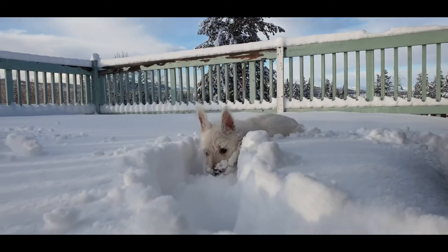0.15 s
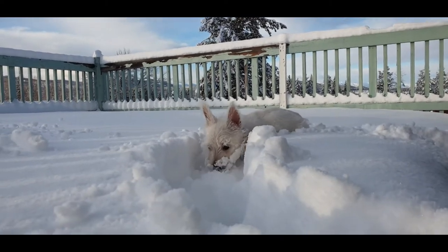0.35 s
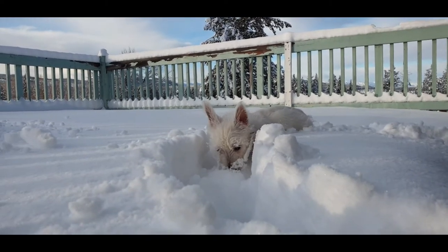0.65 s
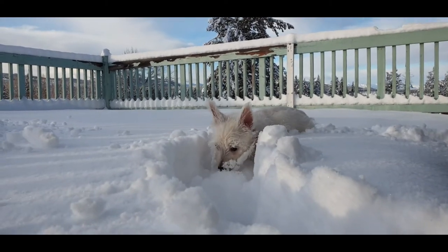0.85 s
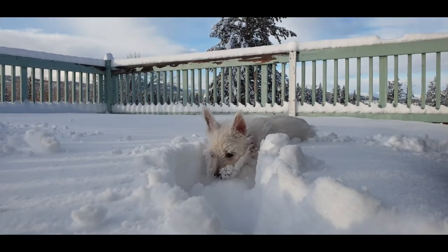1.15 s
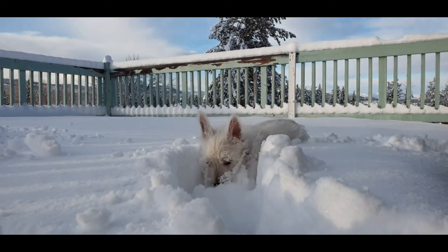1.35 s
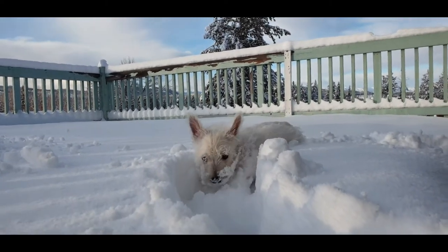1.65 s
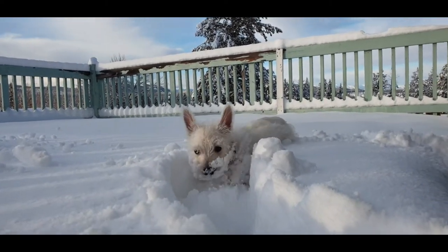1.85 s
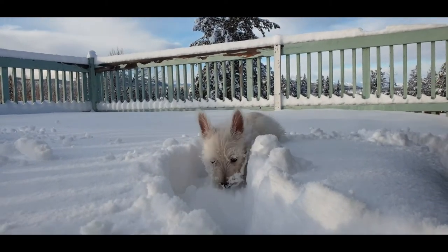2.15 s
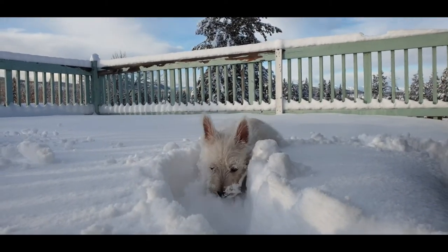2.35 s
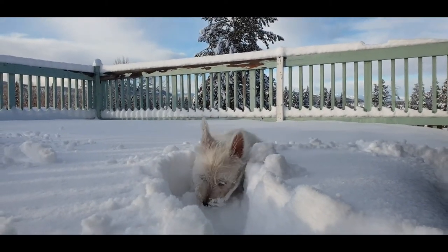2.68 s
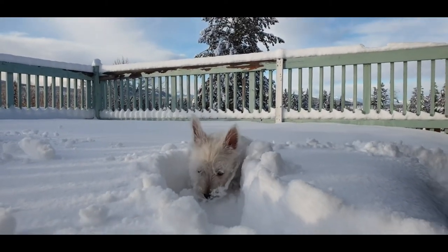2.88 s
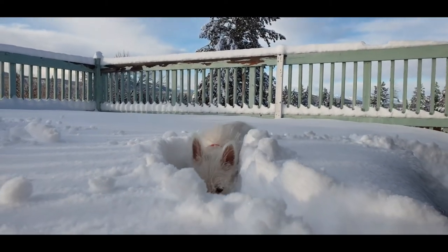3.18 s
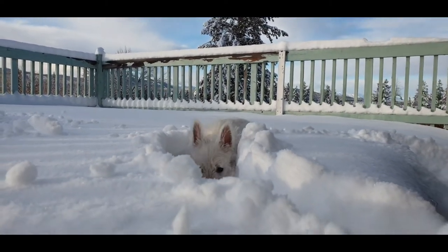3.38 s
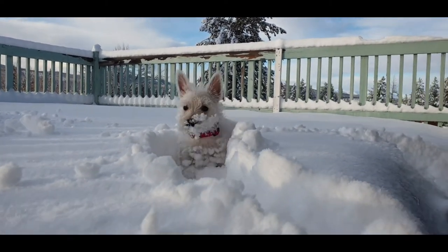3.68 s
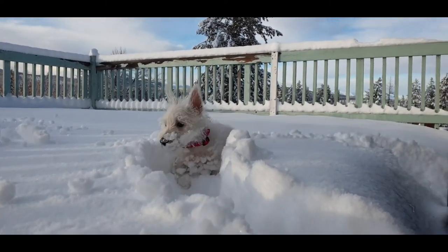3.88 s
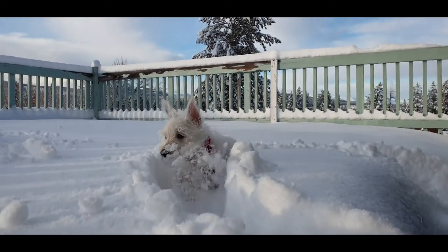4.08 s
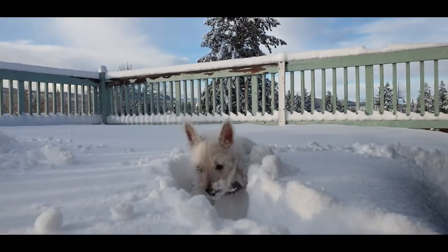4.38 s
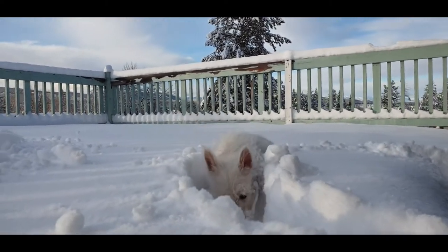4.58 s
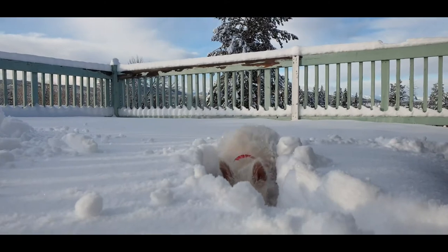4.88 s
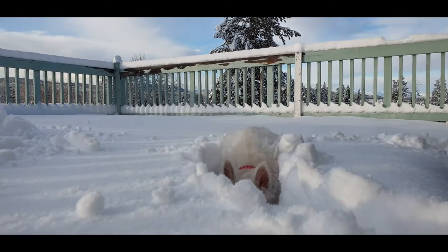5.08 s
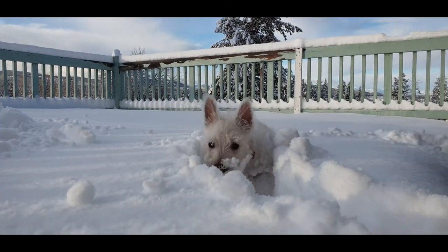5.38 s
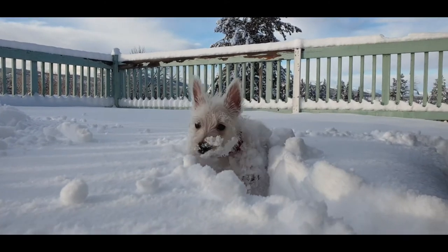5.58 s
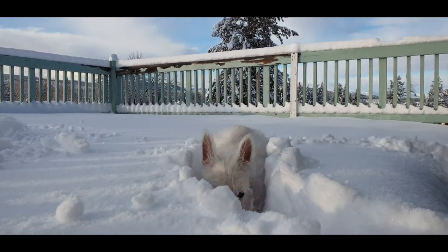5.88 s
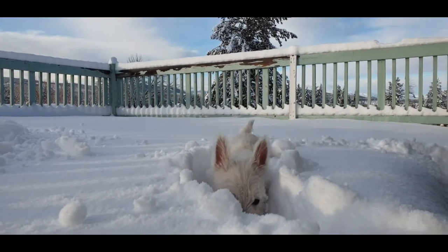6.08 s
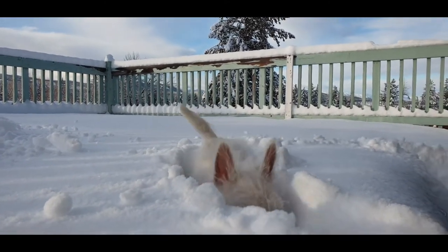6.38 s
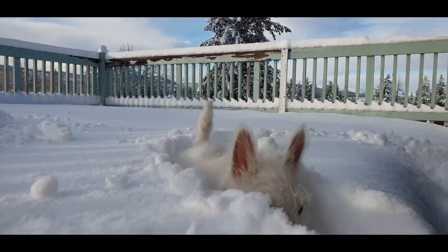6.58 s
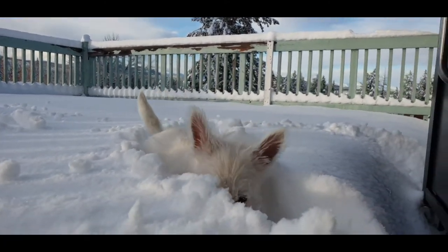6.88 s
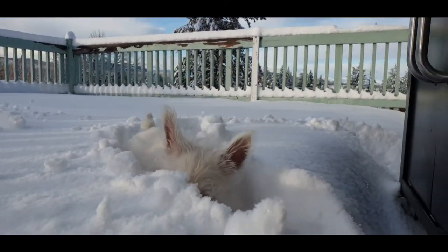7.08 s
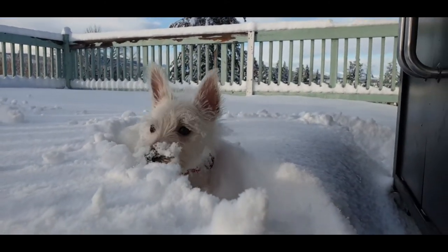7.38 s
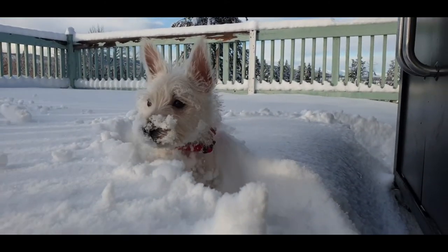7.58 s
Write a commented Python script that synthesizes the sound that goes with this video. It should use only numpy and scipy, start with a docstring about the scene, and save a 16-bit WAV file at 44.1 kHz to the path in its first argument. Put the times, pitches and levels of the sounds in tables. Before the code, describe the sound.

Close handheld stereo microphone in deep snow that absorbs all echo. Heavy hollow thumps hit buried deck boards at once, then near silence with small knocks, cloth brushes and finger clicks at right. From just after two seconds a small dog shoves through powder, crunching, swishing and thudding in uneven bursts, strongest around four seconds. Collar-like tinkling follows the thuds; later digging is lighter, finishing with crisp ticks and short snow scrapes over faint rumble.

```python
"""A puppy digs in deep powder on a wooden deck: snow packs, shears and sprays as coloured noise and grains.
Steps thump the boards with decaying sine booms and noise bursts; paws and muzzle scuff more softly.
Small hard things tick and a metal pull tinkles, as short bursts and a narrow band of chatter.
Someone close by brushes jacket cloth (swelling noise) and catches a finger on a hand-held camera,
by its right microphone (filtered clicks). A low outdoor rumble and faint hiss lie under everything."""
import sys
import numpy as np
from scipy import signal
from scipy.fft import rfft, irfft
from scipy.io import wavfile
from scipy.ndimage import uniform_filter1d

SR = 44100
rng = np.random.default_rng(int(sys.argv[2]) if len(sys.argv) > 2 else 0)


def transcribe(u):
    """Save the signal u as a 16-bit wav file named by the first command-line argument.

    u: samples, shape (n,) or (channels, n), limited to [-1, 1]; the rate is SR.
    q: integer samples, one column per channel.
    """
    v = np.clip(np.atleast_2d(u).T, -1, 1)
    q = np.round(v * 32767).astype(np.int16)
    wavfile.write(sys.argv[1], SR, q)


N = 341334
TIME, HZ = np.arange(N) / SR, np.fft.rfftfreq(N, 1 / SR)

# Relative spectral density of disturbed snow: frequency_hz, density_db
SNOW_COLOUR = [(70, -7), (170, 6.5), (290, -10.5), (450, -4), (620, -5.5), (830, -13), (1200, -11),
               (1800, -13.5), (2800, -17), (3600, -23), (7700, -27.5), (9800, -22), (11900, -25),
               (15500, -35.5)]
# Usual balance of the microphone pair: frequency_hz, left_minus_right_db
USUAL_SIDE = [(100, 4), (200, 3.5), (400, 9), (750, 8), (1400, 0.5), (2600, -8.5), (6000, -1.5), (12000, 4)]


def gain_of(db):
    """Level to amplitude: 20 dB is a factor of ten."""
    return 10 ** (np.asarray(db) / 20)


def evened(x):
    """Normalises the mean power, so that the rms is 1."""
    return x / np.sqrt(np.mean(x ** 2) + 1e-20)


def read(points, hz):
    """Interpolates a table along a logarithmic frequency axis."""
    f, value = np.transpose(points)
    return np.interp(np.log(hz + 1), np.log(f + 1), value)


def add(mix, start_s, sound):
    """Superposition: sound pressures add from start_s on."""
    part = mix[:, max(round(start_s * SR), 0):][:, :sound.shape[1]]
    part += sound[:, :part.shape[1]]


def panned(left_db):
    """Constant-power panning: gains of a left-right level difference."""
    return np.sqrt(2 / (1 + gain_of([-2 * left_db, 2 * left_db])))


def below(hz, edge_hz, order=6):
    """Crossover: the share of the power that lies below the edge."""
    return 1 / (1 + (hz / edge_hz) ** order)


def heard(drive, colour, side=USUAL_SIDE):
    """Spaced microphones: coherence falls from the bass to the treble; colour filters both."""
    # left-right coherence: frequency_hz, coherence (0 to 1)
    coherence = [(100, .998), (200, .99), (370, .94), (700, .82), (1400, .3), (2600, .4), (5000, .12),
                 (15000, .06)]
    size = drive.shape[1]
    hz = np.fft.rfftfreq(size, 1 / SR)
    first, second = rfft(drive)
    same = np.clip(read(coherence, hz), -1, 1)
    pair = np.array([first, same * first + np.sqrt(1 - same ** 2) * second])
    return evened(irfft(pair * colour * panned(read(side, hz)), size))


def hiss():
    """White noise: two unrelated streams of contacts too dense to tell apart."""
    return rng.standard_normal((2, N))


def grains(per_s, spread_db, clump_db):
    """Shot noise: random impulses of uneven size, louder in clumps of a few milliseconds."""
    clumps = uniform_filter1d(rng.standard_normal(N), size=300)
    clumps = evened(uniform_filter1d(clumps, size=200))
    spread = np.minimum(rng.exponential(1, N), 4)
    size = gain_of(spread_db * spread + clump_db * clumps)
    happens = rng.random(N) < per_s / SR
    return rng.standard_normal((2, N)) * size * happens


def patchy(x, patch_db, size=1024):
    """Shifting contact: rubbing surfaces drift in colour, in patches some 150 Hz wide and 50 ms long."""
    overlap = size * 3 // 4
    z = signal.stft(x, nperseg=size, noverlap=overlap)[2]
    field = uniform_filter1d(rng.standard_normal(z.shape[1:]), size=4, axis=0)  # across frequency
    field = evened(uniform_filter1d(field, size=9, axis=1))  # across time
    drifting = signal.istft(z * gain_of(patch_db * field), nperseg=size, noverlap=overlap)[1]
    return evened(drifting[:, :x.shape[1]])


def swells(rows):
    """Friction follows speed: each short stroke swells and fades as one smooth hump."""
    return sum(gain_of(db) * np.exp(-.5 * abs((TIME - s) / half) ** 3) for s, db, half in rows)


def click(colour, size=2048):
    """Minimum phase: the most compact causal click with this spectrum."""
    log_gain = np.log(gain_of(read(colour, abs(np.fft.fftfreq(size, 1 / SR)))))
    wave = np.fft.ifft(np.exp(np.conj(signal.hilbert(log_gain)))).real
    return wave / np.linalg.norm(wave) * np.sqrt(SR * .004)  # the energy of 4 ms at rms 1


def outdoors(packing):
    """Structure-borne rumble swells as weight drags over the deck, under faint even airborne hiss."""
    # relative spectral density of rumble and hiss: frequency_hz, density_db
    air_colour = [(15, -48), (28, -9), (60, -4), (120, -4.5), (230, -17.5), (350, -26), (500, -36),
                  (800, -43.5), (1600, -48.5), (3100, -45.5), (4500, -54), (7500, -56.5), (10000, -52.5),
                  (15500, -51)]
    rumble_db, hiss_db = -56, -75
    drag_db = 0.5  # rumble under a shove, against its packing
    colour, low = gain_of(read(air_colour, HZ)), below(HZ, 470)
    rumble = heard(grains(20000, 1, 1.8), colour * np.sqrt(low))
    rumble = rumble * np.hypot(gain_of(rumble_db), gain_of(drag_db) * packing)
    air = heard(hiss(), colour * np.sqrt(1 - low), [(500, 3.1), (2000, 1.8), (15000, 2.4)])
    return rumble + gain_of(hiss_db) * air


def jacket(left_db=1.0):
    """Sliding friction: smooth cloth on cloth gives short swells of bright hiss."""
    # brushes of cloth: peak_s, level_db, half_length_s
    brushes = [(.522, -59.5, 0.02), (0.723, -73, 0.021), (1.305, -55, 0.035), (1.823, -57.5, 0.019),
               (1.887, -65.5, .05), (3.104, -67.5, 0.054), (5.372, -68.5, 0.037), (6.079, -69, 0.033),
               (6.82, -74.5, 0.2), (7.418, -60, 0.047)]
    # relative spectral density: frequency_hz, density_db
    cloth_colour = [(1000, -6), (2000, -6), (3200, 5), (6000, 2), (11000, 7), (15500, 4)]
    side = [(1000, left_db), (15000, left_db)]
    cloth = heard(hiss(), gain_of(read(cloth_colour, HZ)), side)
    return swells(brushes) * patchy(cloth, 1.6)


def finger(left_db=-25, push_db=8, fizz_db=-7, slip_db=-17, slip_t60=0.014, size=400):
    """Stick-slip: a finger drags and catches on the case, heard nearly all in the right microphone."""
    # catches: start_s, snap_db, knock_db, push_db
    catches = [(1.4473, -43, -40.5, -36), (1.469, -55, -63, -30), (1.4771, -47, -35.5, -89),
               (1.4987, -53, -66, -62), (1.5053, -48.5, -64, -83)]
    # relative spectra of snap, knock on the case and soft push: frequency_hz, level_db
    snap_colour = [(1500, 1), (3300, -5), (5000, -3.5), (6500, -9.5), (8500, -9), (10000, -4), (12500, -2),
                   (16000, -15)]
    case_colour = [(200, 9), (700, 10), (1500, 9.5), (2300, 11.5), (3500, 0), (5000, -5), (8000, -63)]
    push_colour = [(30, -11), (100, -10), (200, -5.5), (400, -14), (900, -30.5), (3000, -87)]
    rub_db, rub_hold_s, rub_fade_db_per_s = -40.5, 0.03, 521
    snap, knock, push = click(snap_colour), click(case_colour), click(push_colour)
    contact = knock + gain_of(push_db) * push + gain_of(fizz_db) * snap
    drag = evened(signal.oaconvolve(grains(4800, 1.1, 3.5)[0], contact)[:N])
    age = TIME - catches[0][0]  # it drags from the first catch on, then lifts
    rub_level = gain_of(rub_db - rub_fade_db_per_s * np.maximum(age - rub_hold_s, 0))
    out = (drag * (age > 0) * rub_level)[None]
    for s, snap_db, knock_db, weight_db in catches:
        # a catch, then a brief skid
        slip = rng.standard_normal(size) * gain_of(slip_db - 60 * TIME[:size] / slip_t60)
        slip[0] = 1
        crack = np.convolve(snap, slip / np.linalg.norm(slip))[:len(snap)]
        hit = gain_of(snap_db) * crack + gain_of(knock_db) * knock + gain_of(weight_db) * push
        add(out, s, hit[None])
    return panned(left_db)[:, None] * out


def tinkles(ring_hz=9600, width_hz=1500, left_db=-14):
    """Resonance: contacts of a small metal pull chatter in one broad, high band on the right."""
    # tinkles: start_s, level_db, t60_s
    tinkle_events = [(2.86, -63, 0.018), (3.989, -48, 0.0034), (4.049, -63, 0.066), (4.075, -54, 0.29),
                     (4.169, -61, 1), (6.975, -58, 0.0029), (7.104, -48.5, 0.0057)]
    resonance = 1 / (1 + ((HZ - ring_hz) / width_hz) ** 2) ** 2
    side = [(1000, left_db), (15000, left_db)]
    chatter = heard(grains(6000, 0.5, 0.61), resonance, side)
    level = sum(gain_of(db - 60 * abs(TIME - s) / t60) * (TIME >= s) for s, db, t60 in tinkle_events)
    return chatter * level


def ticks(snap_t60=0.0086, knock_t60=0.033, snap_rise=0.00056, knock_rise=0.00197, size=4096):
    """Impact: a quick burst of tiny contacts over a duller knock, softer in onset and slower to decay."""
    # ticks and cracks of crust, ice crumbs and collar: start_s, snap_db, knock_db, left_minus_right_db
    tick_events = [(.2528, -76, -27, -9), (0.473, -101, -61.5, 7), (0.6951, -45, -89, -13),
                   (1.0347, -86, -45.5, -7), (1.681, -88, -55.5, 2), (2.889, -84, -58.5, 3),
                   (3.121, -84, -64, 6), (4.007, -64, -56.5, -6), (4.417, -68, -44.5, 7),
                   (4.654, -80, -52, -1), (5.3123, -81, -59, 8), (6.323, -50, -65, -1.5),
                   (6.531, -74, -51.5, -1), (6.9314, -55.5, -64.5, -9), (7.143, -45.5, -57, -9),
                   (7.176, -53, -56, -28), (7.2347, -54, -73, 5), (7.254, -46.5, -62, -0.5)]
    # relative spectral densities of snap and knock: frequency_hz, density_db
    snap_colour = [(900, -85.5), (1700, -15.5), (2600, -0.5), (4500, -1), (7000, -8.5), (10000, -9.5),
                   (15500, -10)]
    knock_colour = [(150, 10), (500, 5), (1100, 2.5), (2300, -9), (3600, -26), (10000, -63)]
    out, t, hz = np.zeros((2, N)), np.arange(size) / SR, np.fft.rfftfreq(size, 1 / SR)
    for s, snap_db, knock_db, pan_db in tick_events:
        snap = (snap_db, snap_colour, snap_rise, snap_t60)
        knock = (knock_db, knock_colour, knock_rise, knock_t60)
        for db, colour, rise, t60 in (snap, knock):
            shape = (1 - np.exp(-(t / rise) ** 2)) * gain_of(-60 * t / t60)
            burst = heard(rng.standard_normal((2, size)), gain_of(read(colour, hz))) * shape
            burst = burst / np.std(burst[:, :size // 20])  # level set by the onset
            add(out, s - rise / 2, gain_of(db) * panned(pan_db)[:, None] * burst)
    return out


def scrabble():
    """Granular friction: small paws and a muzzle work the powder further off."""
    # scuffs: peak_s, level_db, half_length_s
    scuffs = [(.5, -75, 0.015), (1.039, -51, 0.0043), (1.058, -64.5, 0.025), (1.40, -87, 0.074),
              (1.595, -70.5, 0.036), (1.69, -74, 0.08), (1.92, -66.5, 0.033), (2.01, -73.5, .031),
              (2.113, -69.5, 0.015), (2.19, -71.5, 0.024), (2.91, -75, 0.031), (3.26, -70, 0.07),
              (4.73, -72, 0.12), (5.335, -72, 0.035), (5.742, -60.5, .028), (6.55, -68.5, 0.027),
              (6.84, -79, 0.16), (7.23, -71, 0.073), (7.42, -76, 0.061)]
    colour = gain_of(read(SNOW_COLOUR, HZ)) * below(HZ, 2900) * (1 - below(HZ, 480))
    crumbs = heard(grains(2500, 0.92, 1.9), colour)
    return swells(scuffs) * patchy(crumbs, 2.5)


def boards(hz):
    """Modal resonance: the deck lifts the bands around its modes."""
    # modes: centre_hz, width_hz, lift_db
    modes = [(166, 66, 7), (171, 105, 11.5), (280, 40, 3.5), (438, 150, 3.5), (616, 380, 1)]
    return gain_of(sum(db / (1 + (2 * (hz - f) / width) ** 2) for f, width, db in modes))


def steps(size=22050):
    """Impact on a damped plate: weight comes down, snow crunches, boards thud and the whole deck booms."""
    # steps on the buried boards: start_s, boom_db, boom_hz, thud_db, crunch_db, time_to_full_weight_s
    step_events = [(0, -14, 55.8, -24, -34.5, 0.0028), (.236, -18.5, 68.6, -22, -34, 0.016),
                   (1.025, -58, 90, -49, -79, 0.0068), (1.294, -44.5, 93.3, -47, -67.5, 0.011),
                   (2.324, -24, 75.3, -40.5, -48, 0.013), (2.387, -29.5, 75.9, -46, -56, 0.012),
                   (2.628, -34.5, 63.7, -56, -49, 0.01), (3.369, -35.5, 55.4, -42.5, -62.5, 0.0079),
                   (3.416, -29.5, 75.3, -44, -78, 0.0093), (3.471, -33.5, 65, -57, -74, 0.0046),
                   (3.615, -39.5, 69, -41.5, -51.5, 0.011), (4.073, -24.5, 57, -37.5, -48, 0.0082),
                   (4.165, -24, 77.6, -34.5, -83, 0.011), (4.224, -32.5, 72, -37.5, -68, 0.0057),
                   (4.265, -33, 78.7, -45, -47, 0.013), (4.415, -34, 78.6, -42, -43.5, 0.0088),
                   (4.655, -52, 83, -47.5, -69, 0.0033), (5.135, -48, 82, -47.5, -55.5, 0.0074),
                   (5.751, -44.5, 64.5, -66, -63, 0.0096), (6.48, -40, 63, -56.5, -80, 0.0041),
                   (6.605, -43.5, 72.4, -55, -89, .0042)]
    # relative spectral density before the deck's resonances: frequency_hz, density_db
    step_colour = [(40, -22), (90, -4), (140, -3), (250, -7.5), (350, -3.5), (520, -7.5), (800, -24),
                   (1300, -34.5), (2000, -41.5), (2800, -36), (3600, -41), (7000, -46), (9500, -55.5),
                   (15000, -53)]
    # decay time of thud, crunch and grit: frequency_hz, t60_s
    step_ring = [(100, 0.22), (250, 0.055), (600, 0.14), (2000, 0.16), (8000, 0.13), (15000, 0.12)]
    # balance: frequency_hz, left_minus_right_db
    step_side = [(100, -0.5), (500, 5.5), (2000, 1), (12000, -2.5)]
    boom_t60_s = 0.27  # equal after every step
    overtone_ratio, overtone_db = 1.3, -12.5  # the deck's second note, against the first
    grit_db, grit_loss_db_per_s = -5.5, 751  # against the crunch: the slower the landing, the less grit
    out, t, hz = np.zeros((2, N)), np.arange(size) / SR, np.fft.rfftfreq(size, 1 / SR)
    colour = gain_of(read(step_colour, hz)) * boards(hz)
    low, high = below(hz, 1200), 1 - below(hz, 2200, order=12)
    middle = (1 - low) * (1 - high)
    for s, boom_db, boom_hz, thud_db, crunch_db, rise in step_events:
        rise = max(rise, .001)
        attack = np.minimum(t / rise, 1) ** 2  # the snow yields before it bears the weight
        grit = crunch_db + grit_db - grit_loss_db_per_s * rise
        turn = 2 * np.pi * boom_hz * t
        notes = np.sin(turn) + gain_of(overtone_db) * np.sin(overtone_ratio * turn)
        sound = panned(2.2)[:, None] * gain_of(boom_db - 60 * t / boom_t60_s) * notes
        for db, share in (thud_db, low), (crunch_db, middle), (grit, high):
            noise = heard(rng.standard_normal((2, size)), colour * np.sqrt(share), step_side)
            f, age, z = signal.stft(noise, SR, nperseg=256)
            decay = gain_of(-60 * np.maximum(age - rise, 0) / read(step_ring, f)[:, None])
            dying = signal.istft(z * decay, SR)[1][:, :size]
            sound = sound + gain_of(db) * dying / np.std(dying[:, :size // 16])
        add(out, s, sound * attack)
    return out


def shoves():
    """Speed-driven friction: each shove bites in, follows one arch of speed and lets go, in three layers."""
    # shoves: start_s, time_to_full_speed_s, length_s, speed_swell_db (times the layer's power),
    # packing_db, shearing_db, spraying_db
    shove_events = [(1.349, .07, 0.12, -2, -60, -94, -80), (2.308, 0.41, 0.4, 16, -50.5, -45, -47),
                    (2.708, 0.027, 0.053, 4.5, -56, -56, -47.5), (3.353, 0.12, 0.11, 13.5, -67, -58.5, -62),
                    (3.438, 0.12, 0.16, 7.5, -52.5, -48, -47.5), (4.051, 0.34, 0.29, 10, -47.5, -53, -54),
                    (4.348, 0.1, 0.34, 1.55, -52.5, -53, -56), (5.13, 0.028, 0.069, 5, -50, -55.5, -63),
                    (5.703, 0.075, 0.047, 8, -60.5, -65.5, -73.5), (6.342, 0.038, 0.13, 1, -59.5, -57, -69),
                    (6.612, 0.091, 0.22, 19, -62, -93, -100), (7.024, 0.071, 0.18, 3, -59, -58, -61.5),
                    (7.098, 0.016, 0.06, 0.5, -60.5, -63, -52.5)]
    # how packing, shearing and spray follow a shove: power_of_speed, lag_s, release_db_per_s
    follow = [(.4, 0.00056, 250), (1.3, 0.0032, 294), (1.7, .022, 392)]
    attack_s = 0.012
    out = np.zeros((3, N))
    for s, to_full, length, swell_db, *levels in shove_events:
        for layer, db, (power, lag, release) in zip(out, levels, follow):
            age = np.maximum(TIME - s - lag, 0)
            speed_db = -swell_db * (np.minimum(age, length) / to_full - 1) ** 2
            release_db = release * np.maximum(age - length, 0)
            layer += np.minimum(age / attack_s, 1) * gain_of(db + power * speed_db - release_db)
    return out


def snow(packing, shearing, spraying):
    """Granular fracture: coarse lumps pack, countless fine grains shear, and the finest spray off as hiss."""
    # balance: frequency_hz, left_minus_right_db
    snow_side = [(150, 2.5), (400, 3.5), (800, 7.5), (1400, 4), (2700, -4.5), (6000, 3), (9800, -7),
                 (12000, -8), (15000, 1)]
    lump_db, lump_s = 1.3, .025  # the snow gives way in lumps: rms unevenness and duration
    colour, low, high = gain_of(read(SNOW_COLOUR, HZ)), below(HZ, 755), 1 - below(HZ, 2870)
    pack = heard(grains(3000, 1.4, 1.03), colour * np.sqrt(low), snow_side)
    shear = heard(hiss(), colour * np.sqrt((1 - low) * (1 - high)), snow_side)
    spray = heard(hiss(), colour * np.sqrt(high), snow_side)
    unevenness = evened(uniform_filter1d(rng.standard_normal(N), size=round(lump_s * SR)))
    lumps = gain_of(lump_db * unevenness)
    crunch = packing * patchy(pack, 3) + shearing * patchy(shear, 2.7)
    return lumps * crunch + spraying * patchy(spray, 1.6)


def scene():
    """Absorption: deep snow swallows all echoes, so the sources simply add."""
    packing, shearing, spraying = shoves()
    background = outdoors(packing) + jacket() + finger()
    small_sounds = tinkles() + ticks() + scrabble()
    return background + small_sounds + steps() + snow(packing, shearing, spraying)


def record(dry, low_cut_hz=30, edge_hz=15830):
    """Band limiting: a low cut and a steep, linear-phase treble limit."""
    low_cut = signal.butter(2, low_cut_hz, "highpass", fs=SR, output="sos")
    band_limit = signal.firwin(511, edge_hz, window=("kaiser", 9), fs=SR)
    return signal.oaconvolve(signal.sosfilt(low_cut, dry), band_limit[None], "same")


dry = scene()
out = record(dry)
transcribe(out)
```